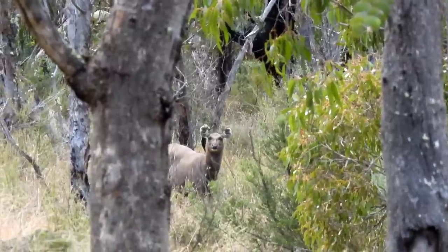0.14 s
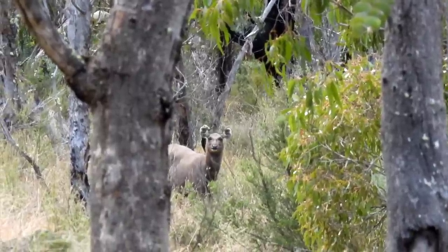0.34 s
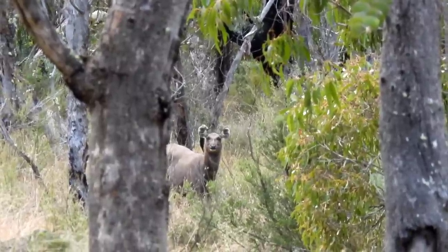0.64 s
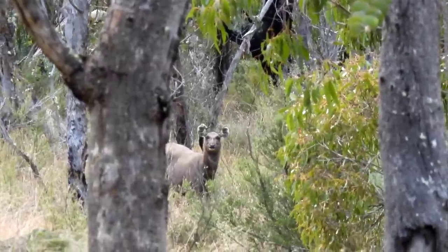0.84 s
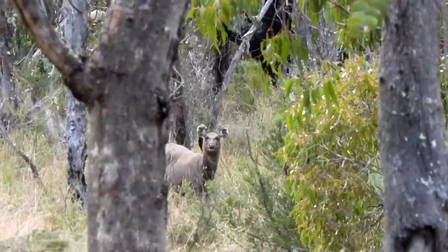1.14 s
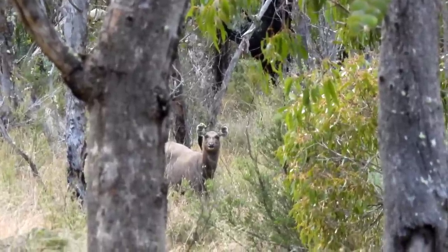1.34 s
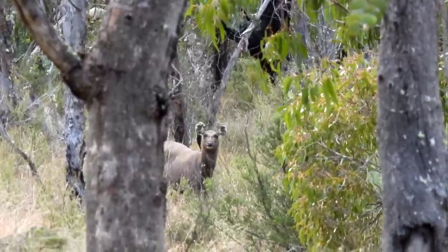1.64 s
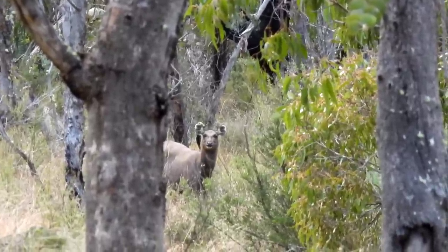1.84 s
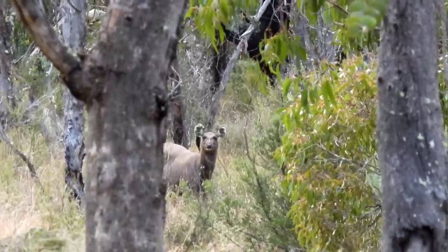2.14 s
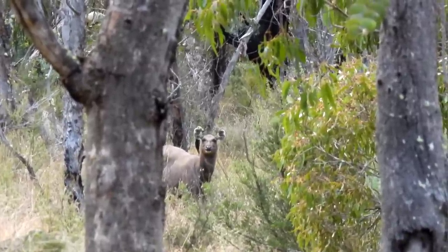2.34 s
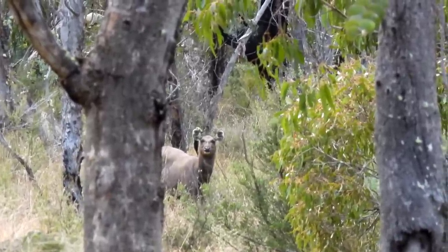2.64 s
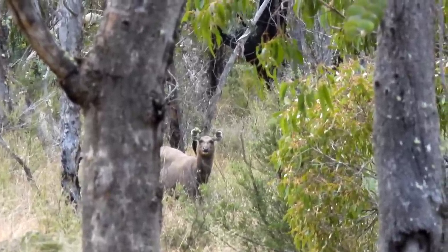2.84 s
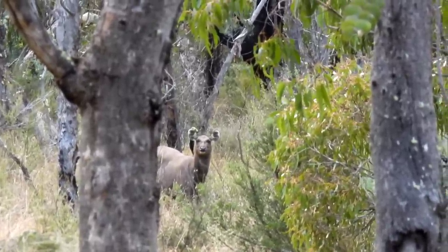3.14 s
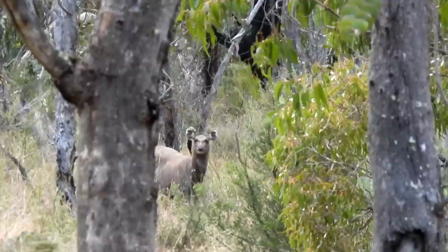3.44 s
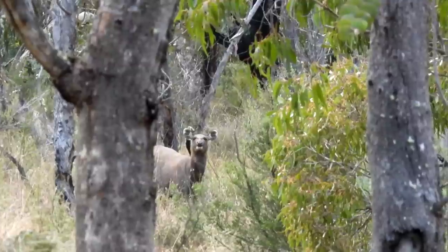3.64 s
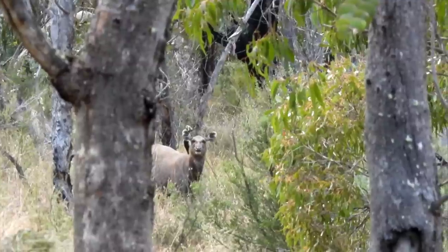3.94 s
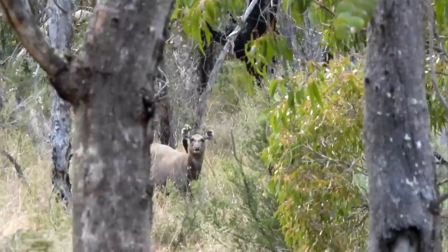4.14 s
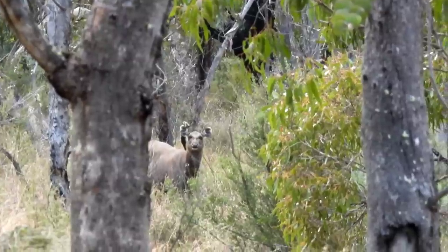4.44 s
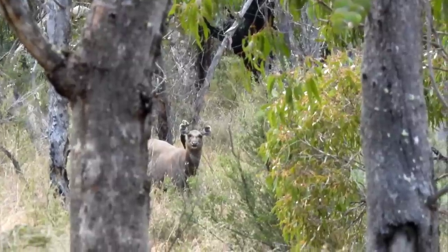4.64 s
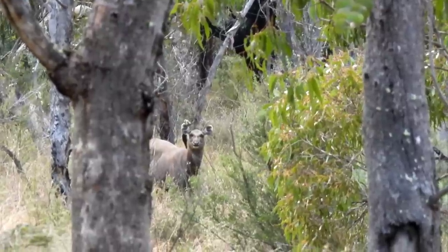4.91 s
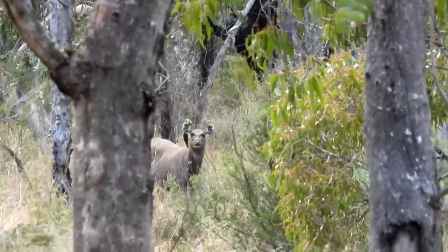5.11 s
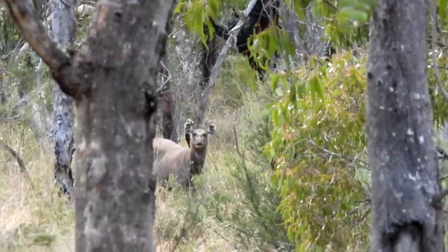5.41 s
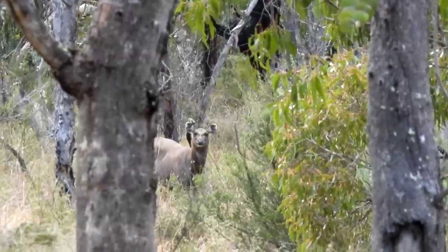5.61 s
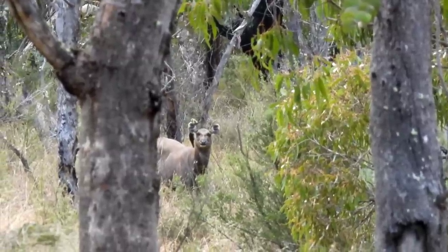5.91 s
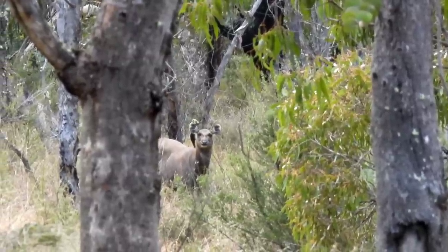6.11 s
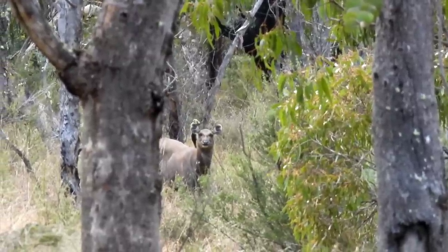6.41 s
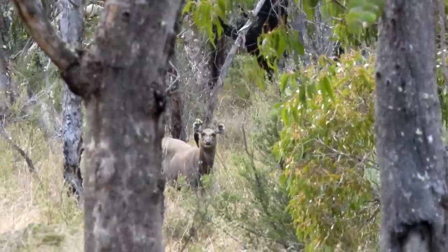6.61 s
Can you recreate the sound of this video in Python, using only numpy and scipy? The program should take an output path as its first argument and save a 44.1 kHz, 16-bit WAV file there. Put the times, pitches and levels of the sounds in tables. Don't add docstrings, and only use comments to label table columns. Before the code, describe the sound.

Open bushland with a faint, steady hush of distant leaves. During the first couple of seconds, cloth rubs softly and small ticks knock the handheld camera. A bird to the right repeats a brief, rising whistle while tiny birds chirp thinly in the trees. At four seconds a deer barks once, very short, rough and loud, with echoes from the trunks. Whistles and chirps continue, with one late tick.

```python
import sys
import numpy as np
from scipy import signal
from scipy.io import wavfile
from scipy.ndimage import uniform_filter1d

SR = 44100
rng = np.random.default_rng(int(sys.argv[2]) if len(sys.argv) > 2 else 0)


def log_audio(samples):
    frames = np.atleast_2d(samples).T
    limited = np.clip(frames, -1, 1)
    pcm = np.round(limited * 32767).astype(np.int16)
    wavfile.write(sys.argv[1], SR, pcm)


def field_ratio(decibels):
    return 10 ** (np.asarray(decibels, dtype=float) / 20)


N = 298116
LEAD = 8192


def evened(x):
    return x / np.sqrt(np.mean(abs(x) ** 2) + 1e-20)


def read(points, hz):
    f, value = np.transpose(points)
    return np.interp(np.log(hz + 1), np.log(f + 1), value)


def add(mix, s, sound):
    part = mix[..., LEAD + round(s * SR):][..., :sound.shape[-1]]
    part += sound[..., :part.shape[-1]]


def resonate(x, hz, width):
    turn = np.exp(2j * np.pi * np.cumsum(hz * np.ones(len(x))) / SR)
    r = np.exp(-np.pi * width / SR)
    smooth = signal.lfilter([(1 - r) ** 2], [1, -2 * r, r * r], x / turn)
    return 2 * (turn * smooth).real


def paired(a, b, hz):
    # hz, correlation (-1 to 1)
    ports = [(60, 0.32), (300, 0.96), (1300, 0.91), (2700, 0.4), (3800, 0.62), (4050, -0.024),
             (6150, -0.18), (6400, 0.884), (9000, 0.99), (13000, 0.26)]
    same = np.clip(read(ports, hz), -1, 1)[:, None]
    right = same * a + np.sqrt(1 - same ** 2) * b
    return np.array([a * field_ratio(0.67), right * field_ratio(-0.5)])


def hiss(shape, level_db, patchy_db, flicker_db):
    frames, hz = N // 128 + 5, np.fft.rfftfreq(512, 1 / SR)
    a, b, c, d, patches = rng.standard_normal((frames, 257, 5)).T
    patches = uniform_filter1d(patches, size=6, axis=0)
    patches = evened(uniform_filter1d(patches, size=24, axis=1))
    flicker = evened(uniform_filter1d(rng.standard_normal(frames), size=3))
    spectrum_db = read(shape, hz)[:, None] + patchy_db * patches + flicker_db * flicker
    z = paired(a + 1j * b, c + 1j * d, hz) * field_ratio(spectrum_db)
    noise = signal.istft(z, nperseg=512, noverlap=384)[1][:, :N]
    return field_ratio(level_db) * evened(noise)


def bush(x, gap=0.0014):
    # hz, t60_s
    bush_decay = [(250, 2.7), (1000, 3.2), (2000, 1.62), (4500, 1.7), (8000, 0.72), (12000, 0.49)]
    taps = np.zeros((2, SR))
    at = np.arange(0, SR - 20, 20) + rng.integers(0, 20, (2, SR // 20 - 1))
    np.put_along_axis(taps, at, rng.choice([-1., 1.], at.shape), axis=1)
    hz, t, z = signal.stft(taps, SR, nperseg=256)
    decay_db = -60 * t / read(bush_decay, hz)[:, None]
    tail = signal.istft(paired(*z, hz) * field_ratio(decay_db), SR, nperseg=256)[1]
    age = np.arange(tail.shape[1]) / SR
    tail *= (1 - np.exp(-age / gap)) * (1 + 5.9 * np.exp(-age * 16))
    tail /= np.linalg.norm(tail[0])
    return signal.fftconvolve(x[None], tail, axes=1)[:, :len(x)]


def bark_voice(t, start_s, mouth):
    # shut_hz, open_hz, width_hz, shut_db, open_db, half_line_share (0-1)
    throat = [(338, 340, 50, -29.5, -46, 0.1), (1000, 800, 120, 0.5, -21, 0),
              (1420, 1500, 180, 7, -5.5, 0.02), (1824, 1810, 380, -2, -5, 0),
              (2020, 2150, 460, -19, -9, 0.6), (2610, 2560, 407, -12, 1, 0.25),
              (3360, 3450, 820, -24.5, -17, 0.1), (4840, 5100, 1500, -33, -23, 0.1),
              (8600, 10300, 2800, -44.5, -36.5, 0.1), (12000, 12000, 2000, -73, -67, .8)]
    rough = .15 + (.3 - .15) * mouth
    bright_db = 3.0 - 20.5 * np.exp(-mouth / 0.088)
    tense = np.sin(np.pi / 2 * np.clip((t - start_s) / .045, 0, 1)) ** 2
    hz = 143 + (167.2 - 143) * tense
    jitter = evened(uniform_filter1d(rng.standard_normal(len(t)), size=150))
    turns = .22 + np.cumsum(hz * (1 + (.004 + .02 * mouth) * jitter)) / SR
    whole = evened(sum(np.cos(2 * np.pi * k * turns) for k in range(2, 90, 2)))
    half = evened(sum(np.cos(2 * np.pi * k * turns) for k in range(1, 90, 2)))
    puffs = evened((0.6 + np.exp(-(turns % 1) / 0.098)) * rng.standard_normal(len(t)))
    voice = 0
    for k, (shut_hz, open_hz, width, shut_db, open_db, share) in enumerate(throat):
        drive = (1 - rough) * (whole + share * half) + rough * (1 + k / 2) * puffs
        band = evened(resonate(drive, shut_hz + mouth * (open_hz - shut_hz), width))
        band_db = shut_db + mouth * (open_db - shut_db) + (k > 1) * bright_db
        voice = voice + (-1) ** k * field_ratio(band_db) * band
    return signal.sosfilt(signal.butter(2, 260, "high", fs=SR, output="sos"), voice)


def deer():
    # time_s, effort_db, mouth_opening (0-1)
    bark = [
        (4.0, -19, 1.0),
        (4.004, -23.5, 0.6),
        (4.014, -14, 0.84),
        (4.025, -12, 0.78),
        (4.034, -8, 0.29),
        (4.051, -8.5, 0.19),
        (4.064, -12.5, 0.15),
        (4.08, -29, .01),
    ]
    # delay_s, level_db, depth_s, left_right_db
    echoes = [
        (.058, -12, 0.0059, 3.5),
        (0.122, -30, 0.0096, 4),
        (0.192, -24, 0.027, 3),
        (.262, -28.5, 0.006, 4),
        (0.579, -39, 0.071, 3),
    ]
    s, *columns = np.transpose(bark)
    t = np.arange(s[0], s[-1], 1 / SR)
    effort_db, mouth = (np.interp(t, s, c) for c in columns)
    voice = bark_voice(t, s[0], mouth)
    dry = np.zeros(LEAD + N)
    add(dry, s[0], field_ratio(effort_db - 4.5) * voice * signal.windows.tukey(len(t), .08))
    direct = (dry + .6 * np.roll(dry, round(SR / 4200))) / 1.1
    scatter = bush(signal.lfilter([4, -3.2], [1], dry), gap=.04)
    out = direct * field_ratio(np.array([[.8], [-.8]])) + field_ratio(-20.0) * scatter

    heard = dry[LEAD + round(s[0] * SR):][:len(t) + 64]
    dull = signal.lfilter([.3], [1, -.7], heard)
    dull = (dull + .85 * np.roll(dull, round(SR / 1000))) / 1.4
    dull = .5 * dull + 0.92 * resonate(dull, 1080, 600) + 3.3 * resonate(dull, 300, 100)
    for delay, db, depth, pan_db in echoes:
        fade = np.exp(-np.arange(2048) / SR / depth)
        faces = rng.standard_normal(2048) * fade * (rng.random(2048) < .05)
        faces[0] = -2.5
        echo = np.convolve(dull, faces / np.linalg.norm(faces))
        add(out, s[0] + delay, field_ratio(db + np.array([[pan_db], [-pan_db]]) / 2) * echo)
    return out


def whistler():
    # start_s, start_hz, top_hz, level_db
    whistles = [
        (-.09, 4050, 5290, -46),
        (1.128, 4150, 5365, -41.5),
        (1.785, 3930, 5283, -41),
        (2.94, 3980, 5170, -42.5),
        (3.785, 3816, 5040, -41.5),
        (4.705, 3700, 4960, -40.5),
        (5.21, 3496, 4450, -39.5),
    ]
    dry, t = np.zeros((3, LEAD + N)), np.arange(0, .09, 1 / SR)
    for k, (s, start_hz, top_hz, db) in enumerate(whistles):
        rise_hz = (top_hz - start_hz) * np.clip(1 - t / 0.061, 0, 1) ** 2.1
        drop_hz = top_hz * (1 - .862) * np.clip((t - .054) / .028, 0, 1)
        hz = top_hz - rise_hz - drop_hz
        tone = np.sin(2 * np.pi * np.cumsum(hz) / SR)
        add(dry[k % 3], s, field_ratio(db - 0.5) * tone * signal.windows.tukey(len(t), .08))
    left, right = field_ratio(6.0) * sum(bush(x) for x in dry)
    right = right + 1.2 * dry.sum(0)
    return np.array([0.63 * left - 0.38 * right, right])


def small_birds():
    # start_s, length_s, end_hz, level_db
    chips = [(2.045, .05, 4150, -65), (5.525, 0.031, 6950, -59.5), (5.577, 0.013, 8070, -56.5),
             (5.682, .02, 8300, -57.5), (5.745, 0.0295, 7230, -58.5), (5.815, 0.034, 6850, -59),
             (5.99, 0.012, 6630, -55), (6.04, 0.011, 8030, -53.5), (6.145, 0.018, 8270, -55.5),
             (6.205, 0.028, 7180, -56.5), (6.272, 0.026, 6800, -53.5), (6.43, .016, 7520, -60)]
    flicks = [(1.21, 0.044, 6600, -67), (2.016, 0.022, 7170, -51), (2.09, 0.016, 4200, -52.5),
              (2.15, 0.0206, 4310, -64), (2.55, 0.028, 7000, -70), (2.92, .066, 7860, -64.5),
              (3.058, 0.012, 6500, -53.5), (4.54, 0.015, 7600, -56), (4.67, 0.0354, 7600, -63),
              (4.733, .028, 7070, -60.5), (4.78, 0.031, 7250, -57.5), (5.11, 0.057, 7463, -60),
              (5.76, 0.046, 7620, -61), (6.49, 0.011, 6150, -57)]
    seeps = [(1.14, 0.037, 8200, -65), (1.685, 0.058, 8320, -63), (2.365, 0.09, 7970, -64),
             (3.13, 0.102, 7790, -73), (3.37, 0.029, 7280, -60.5), (3.87, 0.17, 8300, -70.5),
             (4.3, 0.091, 8400, -66), (4.94, .06, 8050, -77), (6.02, .092, 8300, -70),
             (6.5, .069, 7694, -69), (6.605, .087, 7870, -66)]
    sweeps = [(.11, 0.052, 7360, -57.5), (1.61, 0.055, 8900, -65.5), (2.235, 0.041, 7980, -62),
              (2.8, .056, 8360, -66), (3.35, 0.025, 8300, -59)]
    pips = [(1.9, .055, 2660, -60.5), (2.0, .02, 8600, -62.5), (2.035, .02, 2860, -58.5),
            (3.36, .033, 4550, -67), (3.41, .027, 4630, -72), (3.565, .0051, 9600, -66),
            (5.12, .044, 6420, -68)]
    birds = [(chips, .87, 0.58),
             (flicks, 1.155, .35),
             (seeps, 1.06, .38),
             (sweeps, .8, .12),
             (pips, 0.94, 0.6)]
    near, far = np.zeros(LEAD + N), np.zeros((3, LEAD + N))
    for notes, slur, direct in birds:
        for k, (s, length, end_hz, db) in enumerate(notes):
            u = np.arange(0, 1, 1 / (length * SR))
            hz = end_hz * (1 + (slur - 1) * (1 - u) ** 2.5)
            waver = np.sin(2 * np.pi * (70 * u * length + np.sin(40 * u + k)))
            hz = hz * (1 + .06 * (1 - direct) ** 2 * waver)
            tone = np.sin(2 * np.pi * np.cumsum(hz) / SR)
            note = field_ratio(db + 6.5) * tone * signal.windows.tukey(len(u), .3)
            add(near, s, direct * note)
            add(far[k % 3], s, note)
    scatter = sum(bush(x, gap=0.0012) for x in far)
    return near * field_ratio(np.array([[1.5], [-.5]])) + field_ratio(-3.0) * scatter


def ticks():
    # start_s, peak_db, body_hz, edge_db, edge_hz
    contacts = [(0.031, -33, 890, -7, 4000), (0.354, -32, 1450, -12.5, 3570),
                (0.38, -48.5, 1060, 4.5, 4300), (0.508, -31.5, 1420, -12.5, 4470),
                (0.54, -33.5, 1040, -6, 7800), (0.762, -46, 1160, 1, 7500), (0.771, -29, 1440, -10, 4260),
                (0.834, -37.5, 1170, -14, 7040), (0.923, -31.5, 1130, -18, 6560),
                (1.529, -30.5, 2810, -18, 3940), (1.536, -32.5, 2770, -9.5, 3840),
                (1.637, -38, 1220, -14, 3600), (1.799, -54.5, 1220, 5, 6200), (2.209, -39, 1000, -32, 3700),
                (2.679, -39, 1760, -31, 3700), (3.295, -40, 825, -31, 3700), (5.494, -28.5, 980, -20, 4100)]
    out, t = np.zeros(LEAD + N), np.arange(700) / SR
    grit = rng.standard_normal((len(contacts), len(t)))
    for (s, db, hz, edge_db, edge_hz), g in zip(contacts, grit):
        knock = np.sin(2 * np.pi * hz * t) * field_ratio(-60 * t / 0.016) * (1 - np.exp(-t / 0.00054))
        edge = resonate(g * field_ratio(-60 * t / 0.011), edge_hz, 3500)
        edge = field_ratio(edge_db - 13) * evened(resonate(edge, edge_hz, 3500))
        add(out, s, field_ratio(db + 1.5) * (knock + edge))
    return out * field_ratio(np.array([[1.1], [-1.1]]))


def rub_db(t):
    # peak_s, level_db, rise_s (per 18 dB)
    strokes = [
        (.29, -63, 0.3),
        (.52, -56, 0.14),
        (.72, -58, 0.34),
        (.93, -58.5, 0.1),
        (6.55, -75, 1.6),
    ]
    touching = (t > .06) * np.clip((1.8 - t) / 0.26, 0, 1)
    power = field_ratio(2 * -78.5) * touching + 1e-14
    for s, db, rise in strokes:
        power = power + field_ratio(2 * (db - 18 * np.maximum((s - t) / rise, (t - s) / 0.17)))
    return 10 * np.log10(power)


def sleeve(t):
    # hz, density_db (per Hz)
    cloth = [(1500, -37), (2500, -0.5), (3500, 4), (5000, -5), (6500, 3), (8000, -6), (10000, -12.5),
             (13000, -22), (15500, -31), (22000, -100)]
    return hiss(cloth, 6.5 + rub_db(t), patchy_db=3.5, flicker_db=1.5)


def distant_hush(t):
    # hz, density_db (per Hz)
    hush_shape = [(15, -87), (25, -55), (69, -61), (117, -89), (208, -13.5), (492, -5), (691, -1.5),
                  (1260, -3.5), (1650, -8.5), (2070, -16.5), (3500, -17), (3980, -21), (8070, -29),
                  (9950, -38.5), (12900, -54.5), (16800, -101), (22000, -120)]
    # time_s, level_db
    breeze = [(0.0, -49), (0.54, -47.5), (1.88, -48), (2.8, -47.5), (3.5, -49), (4.54, -47), (5.25, -48.5),
              (6.4, -48), (6.76, -46)]
    swell_db = np.interp(t, *np.transpose(breeze))
    return hiss(hush_shape, -48 + swell_db - swell_db.mean(), patchy_db=2.43, flicker_db=0.08)


def scene():
    t = np.arange(N) / SR
    events = deer() + whistler() + small_birds() + ticks()
    return events[:, LEAD:] + sleeve(t) + distant_hush(t)


def band_limit(x):
    return signal.sosfilt(signal.butter(12, 15030, fs=SR, output="sos"), x)


def record(dry):
    held = 1.5 * np.tanh(dry / 1.5)
    cut = signal.sosfilt(signal.butter(4, 150, "high", fs=SR, output="sos"), held)
    return band_limit(cut)


dry = scene()
out = record(dry)
log_audio(out)
```